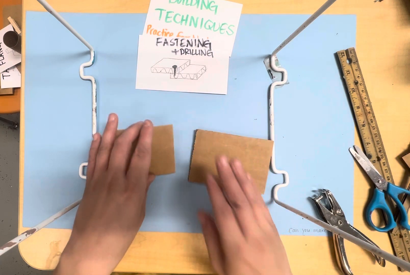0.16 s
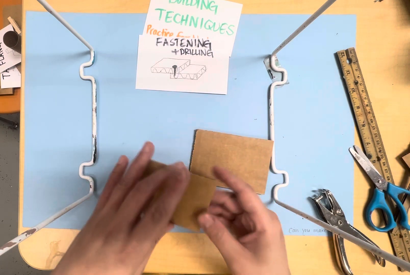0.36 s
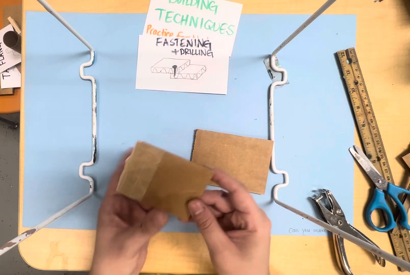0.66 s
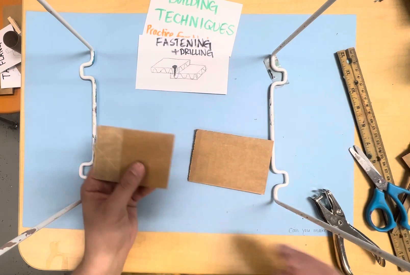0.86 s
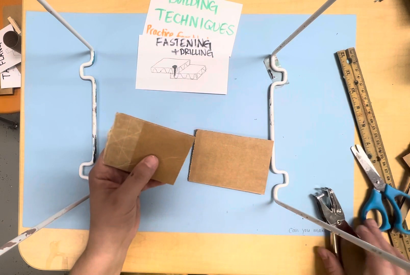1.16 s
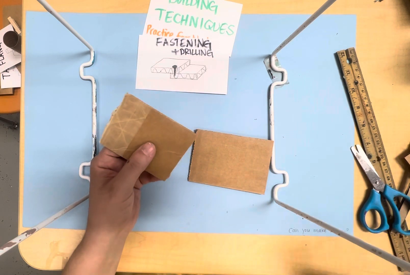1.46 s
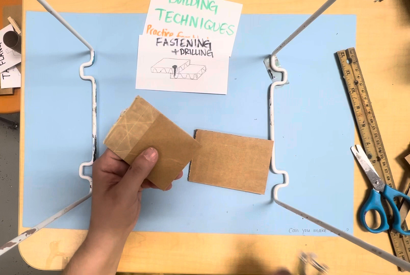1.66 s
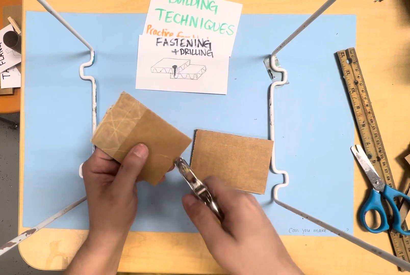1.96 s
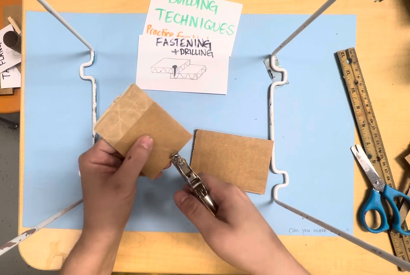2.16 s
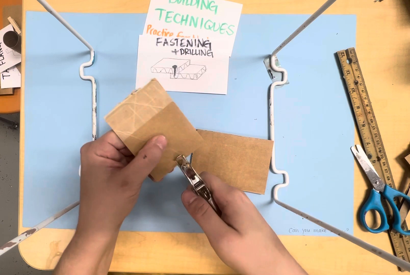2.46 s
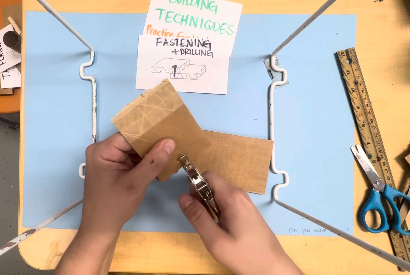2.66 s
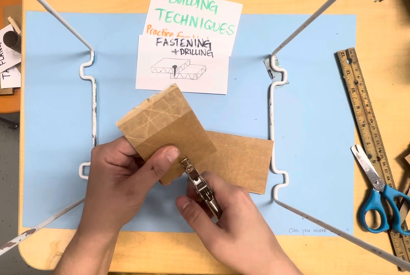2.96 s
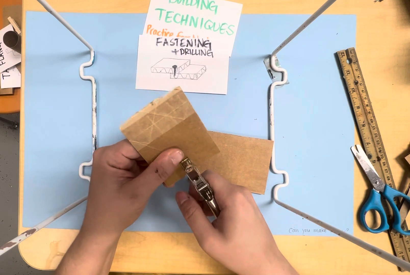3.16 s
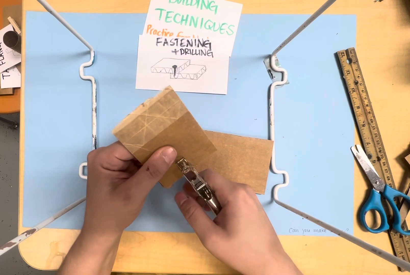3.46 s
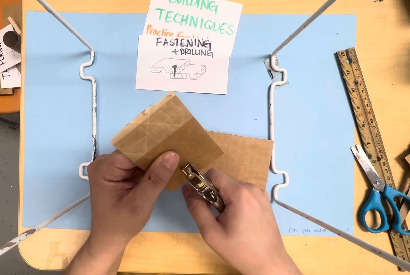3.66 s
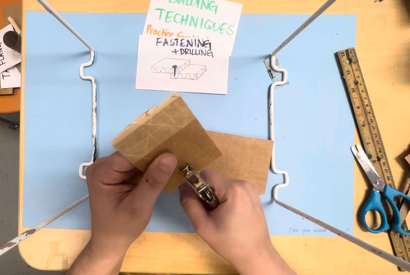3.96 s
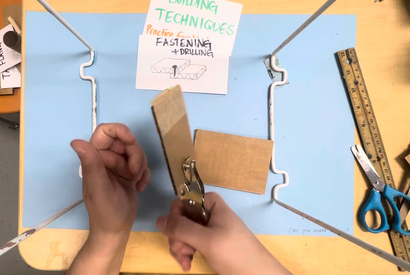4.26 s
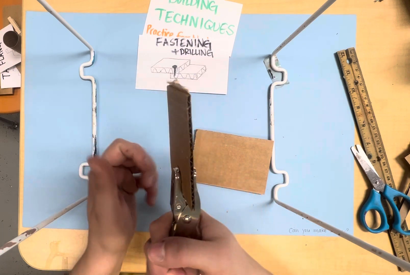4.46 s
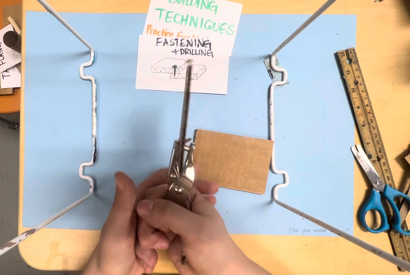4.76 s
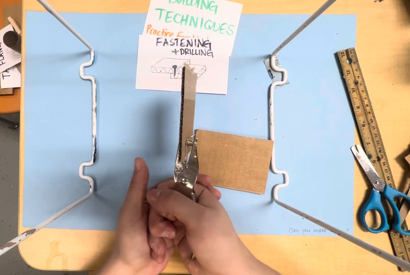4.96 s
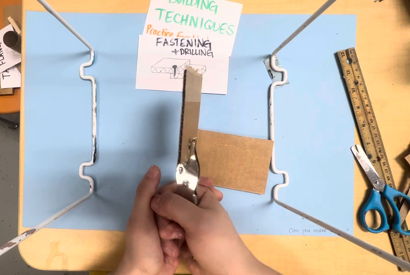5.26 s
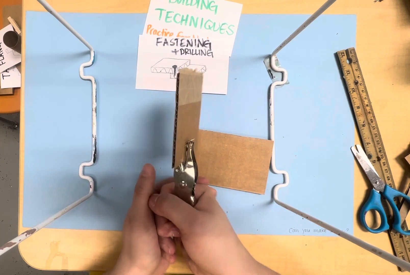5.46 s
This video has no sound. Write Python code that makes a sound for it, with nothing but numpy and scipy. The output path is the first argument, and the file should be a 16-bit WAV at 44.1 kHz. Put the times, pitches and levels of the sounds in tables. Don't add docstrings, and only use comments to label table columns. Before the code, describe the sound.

Cardboard drops and slaps onto a hollow table twice, fingers tick and rustle, then a steel hand punch snaps sharply over a low hum.

```python
import sys
import numpy as np
from scipy import signal
from scipy.fft import rfft, irfft, next_fast_len
from scipy.io import wavfile

SR = 44100
rng = np.random.default_rng(int(sys.argv[2]) if len(sys.argv) > 2 else 0)


def pcm_store(signal):
    levels = np.round(np.clip(np.atleast_2d(signal), -1, 1) * 32767)
    wavfile.write(sys.argv[1], SR, levels.astype(np.int16).T)


def invert_db(x):
    u = np.asarray(x, float) / 20
    return 10 ** u


N = 246959
T = np.arange(N) / SR
RUB_EDGE_S = .003

# (frequency [Hz], level [dB], t60 [s], left minus right [dB], left lead [rad])
SHEET = [(352.3, -4, 0.15, 5.5, 4), (377.5, -26, 0.28, -16, 4.5), (500, -6, 0.25, -3.5, 3.5),
         (529, -22.5, 0.158, 15, 4.5), (630, -30, 0.091, 8, -4), (407, -16.5, 0.11, 9, 10),
         (843, -10.5, 0.074, 11.5, 2), (979, -38.5, 0.51, 12, 4), (1034, -5.5, 0.064, 0.5, 2.5),
         (1131, -20, 0.068, -15.5, 3.5), (1300, -20, 0.05, 5, 1), (1540, -31, 0.14, 5, 3.5),
         (1810, -47, 0.43, 7, -2), (2070, -35, 0.035, 5, 3)]
TABLE = [(52.1, -29, 0.58, -1, .4), (97.57, -23.5, 1, -9.5, 0.87), (170.8, -18.5, 0.44, -4.5, 1.8),
         (213.1, -22.5, 0.41, -8.5, 2.2), (333.7, -22.5, 0.17, 14.5, 1.8), (488, -12, 0.19, -5, 3),
         (606, -15.5, 0.13, -4, 2.8), (702.6, -21, 0.2, 4, 2.6), (855, -17.5, 0.066, 7, 2.6),
         (965, -40, 0.5, 4, 2.2), (1017, -29.5, 0.24, 3, 2.23), (1168, -35, 0.25, -1, 4.4),
         (1646, -42, 0.25, 4, 1.5), (2770, -45, 0.07, 9, 2.7)]
FRAME = [(45, -23, 0.22, -8, 0.43), (87.5, -24.5, 0.2, 8, 1.3), (116.7, 0.5, 0.095, -11, 3.5),
         (166, -13, 0.15, 0, 1.86), (239.8, -18, 0.23, -13.5, 1.53)]
MAT = [(337.7, 6, 0.13, 8.5, 3.5), (550, -14.5, 0.093, -6, 2.9), (844, -14, 0.28, 3, 2.63),
       (1100, -35, 0.4, 17, 2.1), (1233, -25.5, 0.19, -8, 5.2), (1500, -33, 0.17, -11, 2.1),
       (1690, -34, 0.15, 0, 1.1)]


def noise(size=N):
    return rng.standard_normal(size)


def unit(x):
    return x / np.sqrt(np.mean(x ** 2))


def at_ports(a, b, table):
    hz, left_db, right_db, like, lead_rad = np.transpose(table)
    size = next_fast_len(len(a), True)
    log_hz = np.log(np.maximum(np.fft.rfftfreq(size, 1 / SR), 1))
    left, right = (invert_db(np.interp(log_hz, np.log(hz), db)) for db in (left_db, right_db))
    shared = np.interp(log_hz, np.log(hz), np.clip(like, 0, 1) * np.exp(1j * lead_rad))
    own = np.sqrt(np.clip(1 - abs(shared) ** 2, 0, 1))
    spec_a, spec_b = rfft(a, size), rfft(b, size)
    ports = irfft([left * (shared * spec_a + own * spec_b), right * spec_a], size)
    return ports[:, :len(a)] * np.sqrt(SR / 2)


def band(x, hz, width_hz):
    b, a = signal.iirpeak(hz, hz / width_hz, fs=SR)
    return signal.lfilter(b, a, signal.lfilter(b, a, x))


def add(out, s, x):
    i = int(s * SR)
    out[..., i:i + x.shape[-1]] += x[..., :N - i]


def ring(modes, rise_ms, length_s, rough_db):
    t = np.arange(int(length_s * SR)) / SR
    hz, db, t60_s, pan_db, lead_rad = np.transpose(modes)[:, :, None]
    steps = rng.standard_normal((len(modes), 64))
    step_s = np.arange(64) / 60
    flutter_db = rough_db * np.array([np.interp(t, step_s, row) for row in steps])
    rise = (1 - np.exp(-t / (rise_ms / 1000))) ** 2
    fade = invert_db(db + flutter_db - 60 * t / t60_s) * rise
    wander = [np.interp(t, step_s, np.cumsum(row[::-1]) - row[-1]) for row in steps]
    phase = 2 * np.pi * hz * t + .12 * np.array(wander)
    return np.array([np.sum(invert_db(k * pan_db) * fade * np.sin(phase + k * lead_rad), axis=0)
                     for k in (.5, -.5)])


def gate(s, length_s, edge_s, t):
    u = t - s
    sag = np.clip(u, 0, None) / (2 * length_s)
    release = np.clip(u - length_s, 0, None) / edge_s
    return (u > 0) * np.minimum(u / edge_s, 1) * np.exp(-sag - release)


def grit(rate_hz, spread_db):
    clicks = (rng.random(N) < rate_hz / SR) * invert_db(spread_db * rng.exponential(size=N)) * noise()
    return unit(clicks + 0.14 * noise())


def walk(rate_hz):
    return unit(signal.sosfilt(signal.butter(2, rate_hz, fs=SR, output="sos"), noise()))


def air():
    # (frequency [Hz], left [dB/Hz], right [dB/Hz], likeness [0-1], left
    duct = [(22, -90, -89, 1, 4.5), (35.2, -76, -75, 0.82, 0.5), (54.4, -71.5, -69.5, 0.95, -0.4),
            (76, -67.5, -67, 1, -0.5), (104, -61.5, -63, 0.97, -0.15), (134, -64, -62.5, 1, 0.53),
            (161.7, -70.5, -72, 1, -0.7), (164, -72, -73.5, 0.9, 0.64), (290.3, -73.5, -72, 0.82, -0.5),
            (341.5, -78, -80, 0.1, 0), (395, -89, -82, 0.4, -5.5), (442, -93, -84.5, 0.79, 1),
            (547, -84.5, -86.5, 0.6, 1.5), (640, -84.5, -84.5, 0.92, 2.5),
            (780, -91.0, -90.5, 0.81, -3.08), (950, -94.6, -94.6, 0.84, 2.93),
            (1250, -91.6, -94.0, 0.85, 2.97), (1650, -96.5, -88.5, 0.43, -2.88),
            (2100, -92.1, -96.5, 0.15, 0.53), (2700, -95.9, -92.4, 0.25, -1.83),
            (3500, -97.4, -101.3, 0.38, 1.16), (4200, -101.2, -102.4, 0.89, -0.41),
            (5030, -113, -113, 0.26, 2.88), (5700, -104.1, -104.1, 0.99, 0.0),
            (7200, -103.2, -103.2, 0.99, -0.01), (8200, -104.8, -106.3, 0.75, -0.82),
            (9300, -112.7, -112.9, 0.7, -0.49), (10500, -116.9, -116.8, 0.53, -1.66),
            (1100, -90.0, -90.0, 0.81, 2.37), (4710, -105, -105.5, .6, 0.1),
             (5310, -106, -106, 0.64, 0.091)]
    # (time [s], level [dB])
    swell = [(0, 0.5), (1, -1.5), (2, 0), (3, 0), (3.9, 0.5), (4.1, 4.5), (4.5, 4), (5, 1), (5.6, 1.5)]
    both = at_ports(noise(), noise(), sorted(duct))
    low = signal.sosfiltfilt(signal.butter(2, 200, fs=SR, output="sos"), both)
    return (both - low) * invert_db(0.46 * walk(5.9)) + low * invert_db(np.interp(T, *np.transpose(swell)))


def hum():
    # (frequency [Hz], rms level [dB], left minus right [dB], left lead [rad], wobble depth [1])
    lines = [(238.7, -42, -6, -1.4, 0.3), (480.3, -54.5, -8, 2.5, 0.15), (358, -67.5, -10.5, 2, .05)]
    shaft_hz = 26.75
    out, turn = 0, np.cos(2 * np.pi * shaft_hz * T + 0.62 * walk(2.3))
    for hz, db, pan_db, lead_rad, depth in lines:
        size = np.sqrt(2) * invert_db(db + 0.96 * walk(6.3)) * (1 + depth * turn)
        phase = 2 * np.pi * hz * T + 0.18 * walk(4.4)
        out = out + size * np.array([invert_db(k * pan_db) * np.sin(phase + k * lead_rad) for k in (.5, -.5)])
    return out


def slaps():
    # (time [s], length [s], level [dB])
    hits = [(0, 0.0019, -1.5), (.004, 0.011, 2), (0.01, 0.015, 14), (0.025, 0.021, 3), (0.052, 0.032, -6),
            (0.09, 0.026, -22.5), (1.097, .015, -18), (1.114, 0.036, 5), (1.155, 0.027, -2),
            (1.186, 0.014, -0.5), (1.206, 0.039, -6), (1.244, 0.063, -16)]
    # (frequency [Hz], left [dB/Hz], right [dB/Hz], likeness [0-1], left lead [rad])
    colour = [(1190, -65.5, -69, 0.79, 3), (1710, -68, -71.5, 0.96, -2), (2200, -76, -78.5, 0.14, 6),
              (2900, -77.5, -79, 0.23, -4.5), (3400, -94.5, -93, 0.33, 4), (4680, -93.5, -90, 0.46, -0.5),
              (6000, -93, -100, 0.8, 0), (7700, -100, -97, 0.48, -2.5), (9160, -92.5, -95.5, 0.87, -7.5),
              (10000, -109.5, -105.7, 0.22, -4.5)]
    level = sum(invert_db(db) * gate(s, length_s, 0.0013, T) for s, length_s, db in hits)
    a, b = grit(4000, 2.2), grit(4000, 1.2)
    ports = level * at_ports(a, b, [(500, -63.5, -93, 0.52, 3.04)] + colour)
    return ports, invert_db(-37.5) * level * band(band(a, 700, 1000), 700, 1300)


def knocks():
    # (time [s], rise [ms], modes of the thing struck)
    blows = [
        (.0140, 2.3, SHEET),
        (0.035, 10.2, FRAME),
        (1.113, 27, MAT),
        (1.188, 1.15, TABLE),
    ]
    # (time [s], rise [ms], level [dB], favoured pitch [Hz], share of ring time [1], modes)
    presses = [(0.012, 1.5, 1, 1120, 0.35, SHEET), (0.014, 1, -1, 1100, 0.42, SHEET),
               (0.14, 5, -10, 420, 0.52, SHEET), (.065, 4.4, -15, 1034, 1.1, SHEET),
               (0.029, 4, 1, 1100, 0.6, SHEET), (.04, 5.8, 8, 1420, 0.46, SHEET),
               (0.054, 10, -3, 1250, 1.1, SHEET), (1.134, 10, -3, 339, .4, MAT),
               (1.3, 20, -8, 97, 0.36, TABLE), (.048, 16, 5.5, 500, 0.3, SHEET),
               (0.097, 30, 0.5, 410, 1, SHEET), (0.049, 26, -4.5, 99.5, 1.47, TABLE),
               (1.074, 5.6, 0, 94, 0.14, TABLE), (1.133, 19.7, 14.5, 550, 1.02, MAT),
               (1.129, 19, 4, 790, 0.97, TABLE), (1.17, 7.2, 3.5, 167, 0.46, TABLE),
               (1.246, 4.5, -3, 715, 1.8, TABLE), (4.352, 5.9, -11, 485, 0.63, TABLE)]
    # (time [s], level [dB], share of ring time [1], modes)
    bounces = [(.0165, -8, .3, SHEET), (0.02, -6.5, .3, SHEET), (.0228, -11.5, 0.33, SHEET),
               (1.196, -4.5, 0.28, TABLE), (1.202, -3.5, 0.27, TABLE), (1.209, -1.5, 0.22, TABLE),
               (1.223, -9, .3, TABLE), (1.238, -9, 0.22, TABLE), (1.266, -11.5, 0.25, TABLE)]
    out = np.zeros((2, N))
    for s, rise_ms, modes in blows:
        add(out, s, ring(modes, rise_ms, .7, rough_db=2.5))
    for s, rise_ms, db, hz, share, modes in presses:
        pressed = np.array(modes, float)
        pressed[:, 1] += db - 40.5 * abs(np.log2(pressed[:, 0] / hz))
        pressed[:, 2] *= share
        add(out, s, ring(pressed, rise_ms, .45, rough_db=3.0))
    for s, db, share, modes in bounces:
        short = np.array(modes) * [1, 1, share, 1, 1]
        add(out, s, invert_db(db) * ring(short, 0.98, .18, rough_db=2.5))
    return out


def room(force):
    # (frequency [Hz], left [dB/Hz], right [dB/Hz], likeness [0-1], left lead [rad])
    colour = [(400, -67.5, -66.5, 0.64, 4), (566, -61.5, -62.5, 0.74, 2.5), (1000, -65.5, -67, 0.94, 3),
              (1400, -77, -78, 0.64, 2), (1870, -69, -67.5, 0.31, -1.5), (2550, -68.5, -67, 0.68, -3),
              (3430, -76, -78, 0.51, -2.5), (4120, -72.5, -73.5, 0.49, -1.5), (5460, -71, -72, 0.48, -1),
              (6400, -74, -75, 0.99, 1), (7500, -78, -81, 0.46, -4.5), (8850, -79.5, -78, 0.65, -1),
              (10200, -86, -87, 0.58, -1)]
    gap_s, t60_1khz_s, t60_slope, air_loss_hz = .009, 0.46, 0.14, 10100
    t = np.arange(int(.7 * SR)) / SR

    def tail():
        out = 0
        for hz in 350 * 2 ** np.arange(0, 5.1, 1 / 3):
            t60_s = t60_1khz_s * (hz / 1000) ** t60_slope / (1 + (hz / air_loss_hz) ** 4)
            out = out + invert_db(-60 * t / t60_s) * band(noise(len(t)), hz, 0.47 * hz)
        return out

    ports = at_ports(tail(), tail(), [(150, -86.5, -93.0, .8, 0.97)] + colour)
    answer = invert_db(1.5) * np.minimum(t / 0.0036, 1) * ports
    out = np.zeros((2, N))
    add(out, gap_s, signal.fftconvolve(force[None], answer, axes=1)[:, :N])
    return out


def rubs():
    # (time [s], length [s],
    # level [dB], frequency [Hz], left minus right [dB])
    broad = [(0.72, 0.034, -55, 2840, 4), (0.372, 0.035, -61, 1300, 5), (0.717, 0.039, -55.5, 1500, 2),
             (.718, 0.036, -66.5, 8000, 3), (1.653, 0.0073, -66, 7000, -6), (2.396, 0.14, -66.5, 2980, -3),
             (2.8, 0.14, -67, 930, 1), (1.188, .024, -46, 2800, 0), (1.14, .04, -50, 2700, 1),
             (1.226, .034, -55, 2620, 1), (1.096, .017, -45, 800, 0), (.1, .07, -50, 750, 0),
             (.13, .08, -46, 420, 0), (.1, .07, -56, 1100, 0), (3.735, .01, -62, 1000, 0),
             (3.986, 0.06, -65, 5900, -2)]
    # (time [s], length [s], level [dB], frequency [Hz], left minus right [dB])
    edges = [(2.155, 0.038, -56, 2560, 4), (2.108, 0.015, -58, 900, 0), (4.022, 0.028, -58, 2650, -1),
             (7.3, 0.04, -65, 2100, 0), (4.05, 0.059, -59, 1000, 1), (4.07, 0.02, -69, 4900, -2)]
    out = np.zeros((2, 2, N))
    fibres = np.clip([grit(6000, 1.0), grit(6000, 1.3)], -3, 3)
    for rows, width in ((broad, .7), (edges, .25)):
        for s, length_s, db, hz, pan_db in rows:
            near = slice(int(s * SR), int(s * SR) + SR // 4)
            rub = band(fibres[:, near] * gate(s, length_s, RUB_EDGE_S, T[near]), hz, width * hz)
            rub = rub * np.sqrt(SR / (width * hz))
            add(out, s, rub * invert_db(db + np.array([pan_db, -pan_db]) / 2)[:, None, None])
    return out


def ticks():
    # (time [s], peak [dB], frequency [Hz], treble [dB], left minus right [dB])
    taps = [(0.382, -39.5, 4520, -9, -2), (0.382, -34, 1300, -7.5, -1), (.394, -35, 1790, -23, 1),
            (.396, -38.5, 1026, -26, 3.5), (0.696, -40, 2700, -22, -1), (0.699, -41.5, 1400, -32, 3.5),
            (.709, -35, 995, -22, -1), (.709, -47, 2410, -22, 1), (0.7292, -41.5, 1850, -16, 1),
            (.743, -44, 1500, -13.5, 3), (.752, -45, 1685, -11, 0), (0.863, -40, 2690, -26, 4),
            (1.966, -54, 1100, -22, -2), (2.407, -47, 1000, -22, 4), (2.406, -47, 3400, -20, -2),
            (2.421, -49, 950, -21, 3), (2.44, -50, 950, -23, -4), (2.456, -57, 3600, -15, -2),
            (2.468, -47.5, 1100, -13, -6), (2.621, -47, 1000, -17, -2.5), (2.719, -53, 2280, 1.5, -2),
            (3.249, -46.5, 2480, -8, -2), (3.8372, -48.5, 1000, -12, -3), (3.838, -47.5, 1900, -15, -3),
            (4.0064, -48.5, 1830, -17, -2), (4.014, -48, 965, -22, -9), (4.0294, -44, 2650, -23, -5)]
    out, t = np.zeros((2, 2, N)), np.arange(SR // 10) / SR
    for s, db, hz, treble_db, pan_db in taps:
        t60_s = 0.028 * (hz / 1000) ** -0.37
        fade = invert_db(db - 60 * t / t60_s) * np.minimum(t / 0.0025, 1)
        tone = np.sin(2 * np.pi * (hz * t + rng.random((2, 1))))
        buzz = np.array([unit(band(noise(len(t)), hz, hz)) for _ in range(2)])
        crack = np.array([unit(band(noise(len(t)), 6500, 9000)) for _ in range(2)])
        tick = fade * (1.37 * tone + 0.77 * buzz + invert_db(treble_db) * crack)
        add(out, s, tick * invert_db(np.array([pan_db, -pan_db]) / 2)[:, None, None])
    return out


def hand_held(pairs):
    # (frequency [Hz], left [dB/Hz], right [dB/Hz], likeness [0-1], left lead [rad])
    path = [(800, 1, -1, .92, 2.3), (1100, 2, -2, .95, 2.2), (1500, 2, -2, .6, 0), (1900, 1, -1, .93, 1.3),
            (2500, 0, 0, .82, 3.4), (3000, -2, 2, .82, 3.6), (4000, -2, 2, .63, -.2), (7000, 0, 0, .6, -.3),
            (9000, 0, 0, .8, -1)]
    return np.array([at_ports(*pairs[k], path)[k] for k in (0, 1)]) * invert_db(-41.5)


def rattles():
    # (time [s], length [s], level [dB])
    shakes = [
        (1.478, 0.022, -68),
        (1.529, 0.059, -64),
        (1.59, .015, -72),
    ]
    level = sum(invert_db(db) * gate(s, length_s, 0.0056, T) for s, length_s, db in shakes)
    return band(grit(900, 2.1), 5900, 4000) * level


def jaws(force):
    # (frequency [Hz], level [dB], t60 [s], left minus right [dB], left lead [rad])
    modes = [(693, -27, 0.013, 5.5, 2.5), (1090, -5, 0.014, 7, 3), (1323, -10, 0.0092, 0.5, 2.5),
             (2030, -1, 0.0096, -10, 3), (2570, 0, 0.0036, 4, -2.5), (3110, -4, 0.02, -3.5, -2.5),
             (3760, -4.5, 0.0071, -3.5, 1.5), (4280, 0, 0.0071, -1, 0.5), (5080, -12.5, 0.023, 9, 1),
             (6260, -9, 0.019, -2, 5), (7200, -12.5, .006, 4.5, -5.5), (8180, -1.5, 0.0086, 7.5, -1.5),
             (8900, -2, 0.004, -0.5, -5), (9460, 1, 0.005, -2, -1)]
    answer = ring(np.minimum(modes, [SR, 20, .022, 20, 4]), 0.043, .02, rough_db=-0.5)
    answer[:, :3] += invert_db(1.5) * np.outer([1.2, .8], [1, 0, -1])
    return invert_db(-5.5) * signal.fftconvolve(force[None], answer, axes=1)[:, :N]


def clinks():
    # (time [s], level [dB], frequency [Hz], t60 [s])
    touches = [(1.4798, -59, 4680, .05), (1.484, -62, 6000, .04), (1.513, -61, 5830, .06),
               (1.5292, -53, 7000, .03), (1.530, -60, 4500, .06), (1.5446, -53, 6980, .035),
               (1.545, -55, 4730, .04), (1.547, -56, 6000, .03), (1.554, -57, 5100, .04),
               (1.556, -60, 8580, .04), (1.562, -65, 9700, .03), (1.572, -55, 2900, .04),
               (1.592, -60, 5000, .03), (1.594, -62, 5900, .06), (1.6534, -59, 4900, .02),
               (1.654, -61, 8800, .015)]
    out = np.zeros((2, N))
    for s, db, hz, t60_s in touches:
        pair = [(hz, db, t60_s, 1, 0), (0.95 * hz, db - 9, t60_s, -1, 0)]
        add(out, s, ring(pair, .3, .08, rough_db=-1.0))
    return out


def squeaks():
    # (time [s], length [s], level [dB], frequency [Hz], glide [Hz/s])
    turns = [
        (2.118, .075, -60, 1150, 100),
        (4.39, .055, -62, 1150, -100),
        (4.04, .07, -66, 3000, 300),
    ]
    out, t = np.zeros(N), np.arange(SR // 10) / SR
    waver = walk(30)
    for k, (s, length_s, db, hz, glide) in enumerate(turns):
        w = waver[k * len(t):][:len(t)]
        level = invert_db(db + 1.5 * w) * gate(s, length_s, 2 * RUB_EDGE_S, s + t)
        add(out, s, level * np.sin(2 * np.pi * (hz + glide * t / 2) * t + .8 * w[::-1]))
    return out


def tear():
    # (time [s], length [s], level [dB])
    pull = (5.2065, 0.007, -36)
    s, length_s, db = pull
    growth = (T > s) * (T < s + length_s) * np.clip((T - s) / length_s, 0, 1) ** 2
    return invert_db(db) * np.clip(grit(9330, 1.5), -2, 2) * growth


def snap():
    # (time [s], level [dB], gap [ms], push length [ms], pushes [count])
    stages = [
        (5.2125, -19.5, 1.3, .1, 3),
        (5.2170, -20.5, 1.1, .2, 3),
        (5.2206, -6, .5, .02, 2),
        (5.2225, -5.5, 0.887, .04, 2),
        (5.2244, -7.5, .9, 0.44, 3),
        (5.2346, -22.5, 0.83, 0.095, 3),
    ]
    force = np.zeros(N)
    for s, db, gap_ms, push_ms, count in stages:
        for k, (size, late, wide) in enumerate(rng.standard_normal((count, 3))):
            push = np.hanning(int(push_ms * np.exp(wide / 6) * SR / 1000) + 3)[1:-1]
            at_s = s + gap_ms / 1000 * (k + (k > 0) * late / 8)
            add(force, at_s, invert_db(db + size) * push / push.sum())
    return force, invert_db(-1) * (np.arange(N) == int(stages[2][0] * SR))


def handle(crack):
    # (frequency [Hz], width [Hz], level [dB])
    modes = [(572, 130, -0.5), (1900, 190, 1), (2560, 140, 4), (3090, 99, 2), (3800, 150, 4.5),
             (4270, 180, 2.5), (5130, 110, 5), (5500, 250, -2), (6180, 180, -4), (8070, 230, 0),
             (9600, 200, -2)]
    rung = sum(invert_db(db) * band(crack, hz, 2 * width_hz) for hz, width_hz, db in modes)
    return invert_db(1.5) * crack + rung


def scene():
    slap, slap_force = slaps()
    torn = tear()
    pushes, click = snap()
    punch = jaws(torn + rattles() + pushes)
    crack = handle(torn + click)
    fingers = hand_held(rubs() + ticks() + squeaks())
    return knocks() + slap + punch + clinks() + fingers + room(crack + slap_force) + air() + hum()


def top_cut(x):
    return signal.sosfilt(signal.butter(12, 11150, fs=SR, output="sos"), x)


def record(dry):
    top_hz = 10600
    rounded = 1.05 * np.tanh(dry / 1.05)
    mix = signal.sosfilt(signal.cheby1(8, 1, top_hz, fs=SR, output="sos"), rounded)
    return top_cut(mix)


dry = scene()
out = record(dry)
pcm_store(out)
```